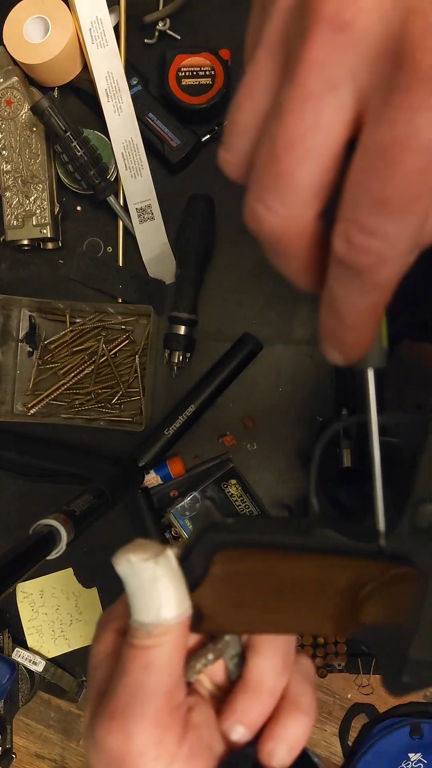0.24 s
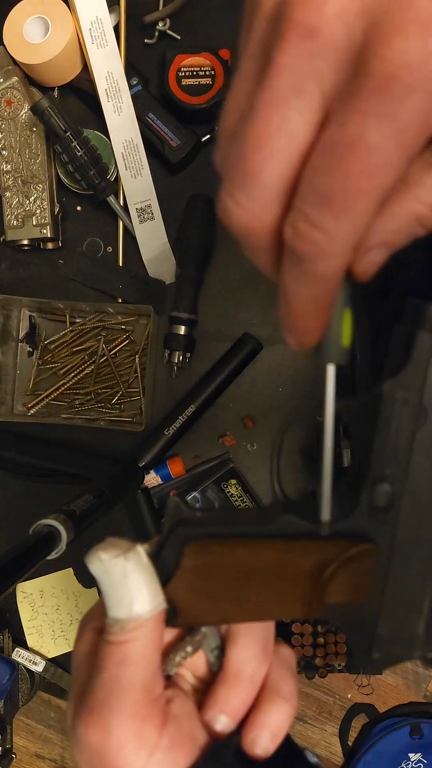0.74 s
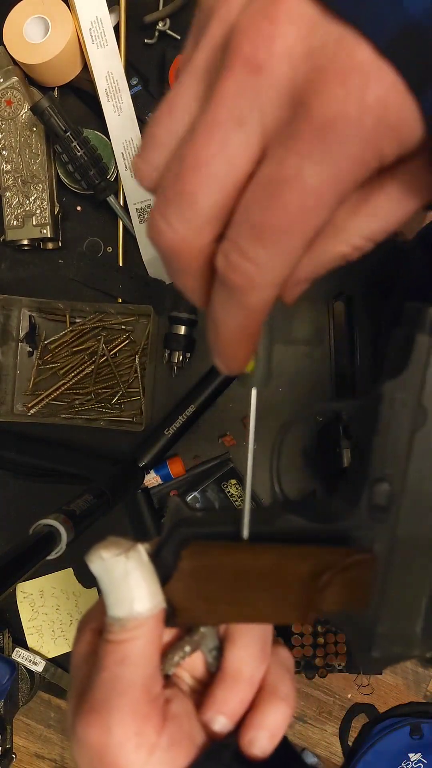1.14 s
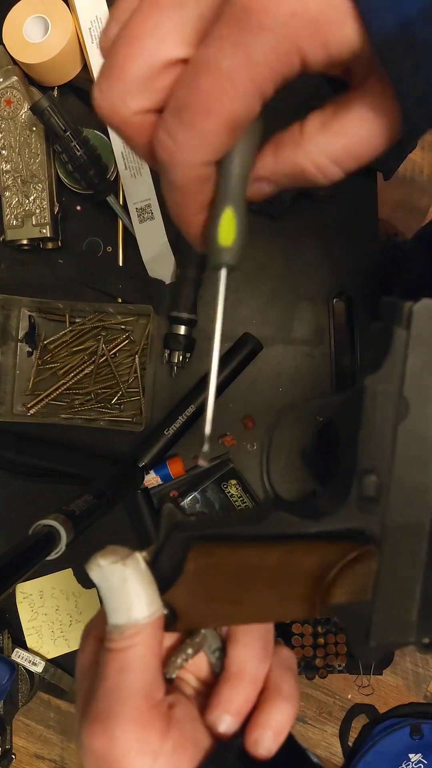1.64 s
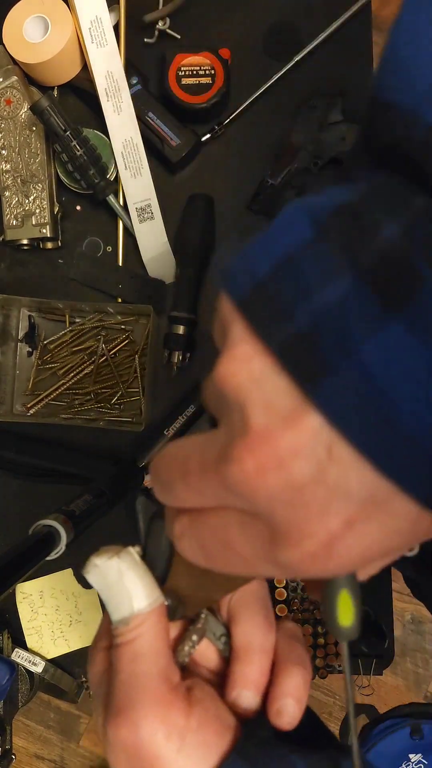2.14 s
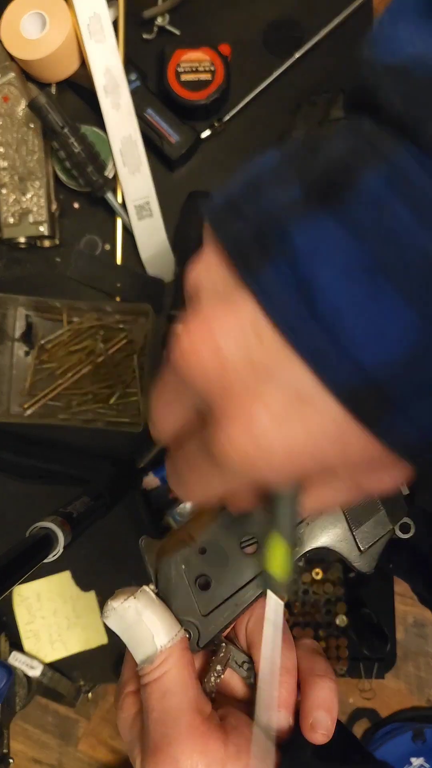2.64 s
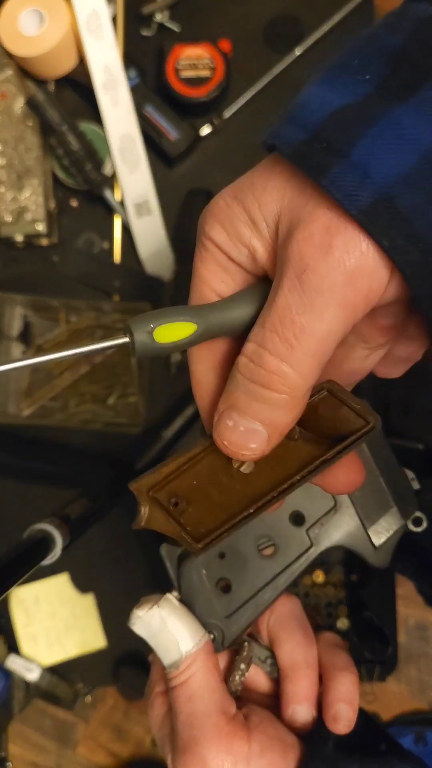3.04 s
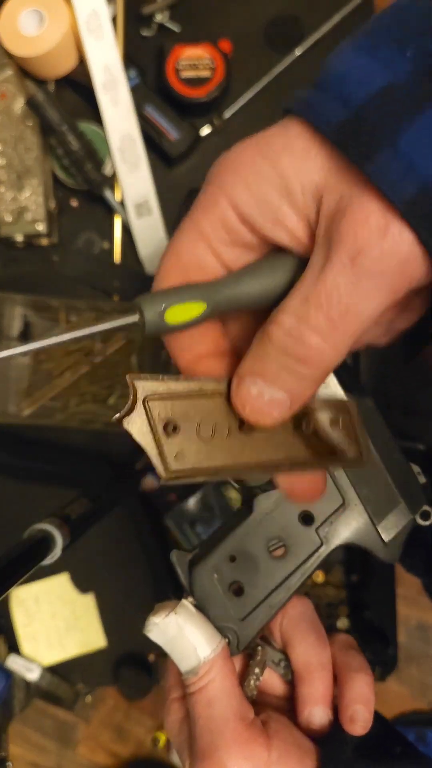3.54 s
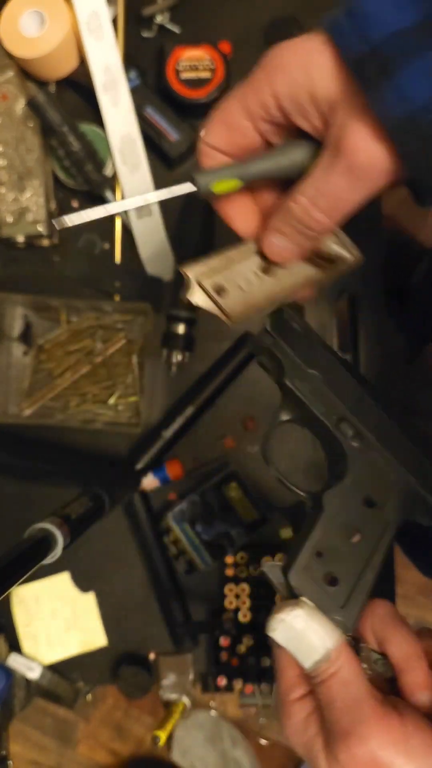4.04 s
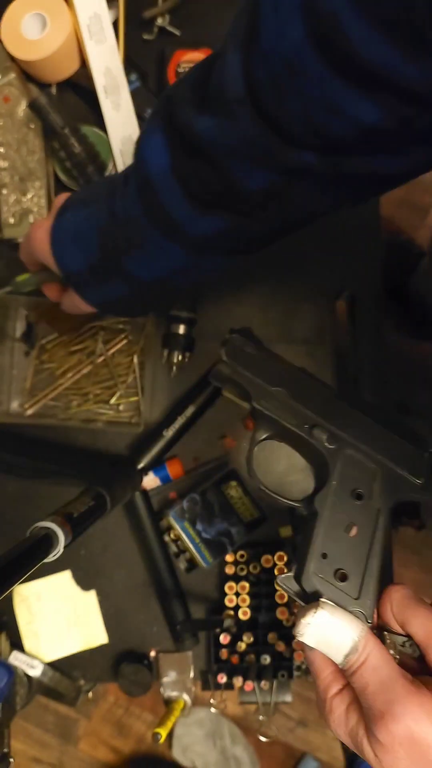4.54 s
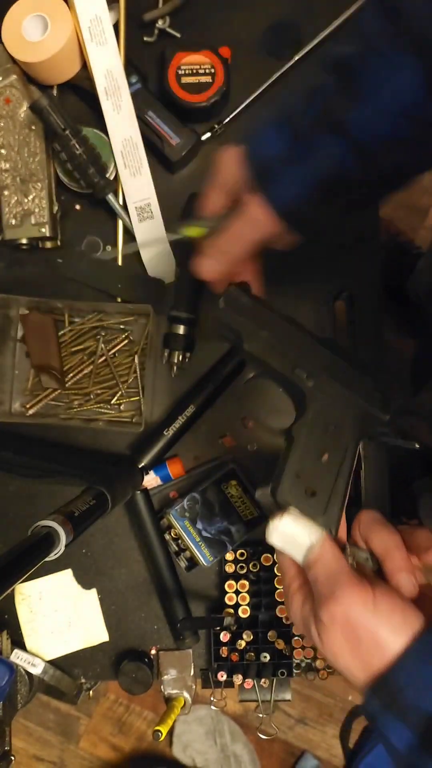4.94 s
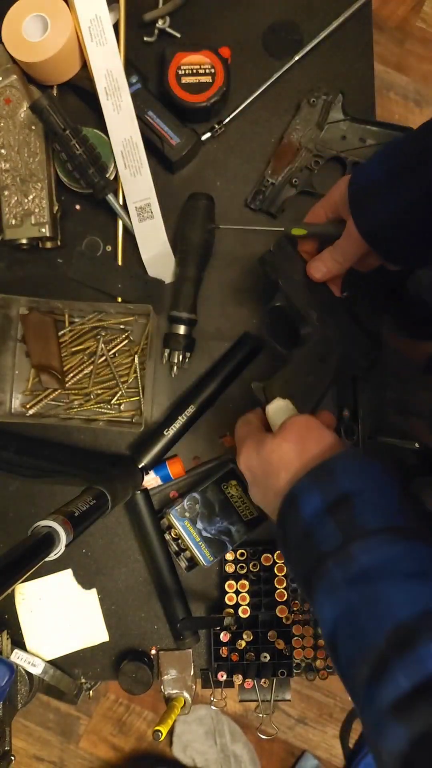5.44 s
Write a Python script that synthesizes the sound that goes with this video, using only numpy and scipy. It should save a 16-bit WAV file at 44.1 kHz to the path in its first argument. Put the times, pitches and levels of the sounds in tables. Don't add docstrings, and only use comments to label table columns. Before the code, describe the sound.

Close stereo phone recording at a workbench in a small room. Sleeve and finger rubbing, then a sharp screwdriver tap, a cluster of prying ticks and scrapes, and a hard metallic knock with quick rebounds. A plate pops and snaps loose with a faint squeal; after quiet handling it drops clattering into a tray of screws and bounces to rest. Low hum and hiss continue throughout.

```python
import sys
import numpy as np
from scipy import signal
from scipy.fft import rfft, irfft
from scipy.io import wavfile
from scipy.ndimage import uniform_filter1d

SR = 44100
rng = np.random.default_rng(int(sys.argv[2]) if len(sys.argv) > 2 else 0)


def to_linear_factor(level_db):
    exponent = np.asarray(level_db, float) / 20
    return 10 ** exponent


def file_out(sig):
    cols = np.atleast_2d(sig).T
    lim = np.clip(cols, -1, 1)
    pcm = np.round(lim * 32767).astype(np.int16)
    wavfile.write(sys.argv[1], SR, pcm)


N = 251370

# (frequency [Hz], density [dB per Hz])
ROOM_SPECTRUM = [(20, -21.5), (132, -9), (223, -17), (290, -23), (2100, -39), (4000, -45.5), (10300, -57),
                 (14500, -50.5)]
# (frequency [Hz], likeness [0-1])
ROOM_LIKENESS = [(100, 0.98), (250, 0.4), (600, 0.7), (2000, 0)]
# (frequency [Hz], level [dB], waver [dB])
HUM_LINES = [(120.3, -62.5, 1.3)]
# (frequency [Hz], width [Hz], level [dB])
MOTOR_BANDS = [(80.5, 20, -70.5), (118, 30, -73), (163, 12, -73.5), (200.3, 24, -67.5)]

FOREARM_SLIDES = [
    (-.05, .4, 0.16, -78, 0),
    (3.4, .4, 0.6, -78.5, 0),
    (4.33, .45, .7, -71, 0),
]
SLEEVE_STROKES = [(-.05, 0.25, 0.65, -67.5, -1), (.85, 0.29, 0.59, -78, -7), (.905, 0.04, 0.17, -61, 9.5),
                  (.97, 0.077, 0.54, -65.5, 4), (1.93, 0.087, 0.93, -59.5, -7),
                  (2.0, 0.11, 0.051, -57.5, -4), (2.08, 0.22, 0.29, -72, -9.5),
                  (2.36, 0.072, 0.15, -70.5, -19), (1.53, 0.1, 0.73, -58.5, -6),
                  (2.46, 0.087, 0.4, -71.5, -8), (2.67, 0.091, 0.15, -61, 1.5), (2.77, 0.22, 0.25, -75, -6),
                  (3.55, 0.3, 0.42, -78.5, -3), (4.35, 0.3, 0.14, -75, -8), (4.45, 0.48, 0.99, -61.5, -1.5),
                  (4.93, 0.13, 0.31, -52.5, -4), (5.15, 0.55, 0.62, -86, -18)]
SKIN_STROKES = [(0.6, 2.84, 0.56, -77.5, 1), (0.845, 0.17, 0.08, -58, 1), (0.97, 0.15, 0.6, -67.5, 13.5),
                (.62, 0.31, 0.06, -76.5, 3), (2.66, 0.056, 0.12, -58.5, 18.5), (1.1, 0.21, 0.7, -94.5, 20),
                (1.48, 0.052, 0.65, -63.5, 2.5), (1.62, 0.39, 0.69, -81, 9), (2.36, 0.22, 0.71, -70, 2),
                (3.38, 3.57, 0.45, -78.5, 1), (2.67, 0.15, 0, -67, 5), (2.74, 0.29, 0.46, -73.5, 2.5),
                (3.4, 0.19, 0.19, -66.5, 3), (3.585, 0.089, 0, -78, 3), (3.64, 0.14, 0.12, -74.5, 3.5),
                (3.88, 0.21, 0.1, -81, 2), (4.035, 0.13, 0.33, -71, 2), (4.35, 0.53, 0.4, -76.5, 4.5),
                (5.16, 0.25, 0.32, -88.5, 6), (5.38, 0.19, 0.22, -69.5, 4.5), (5.56, 0.093, 0.06, -71, 7.5),
                (5.6, 0.1, 0.18, -74, 3)]
SCRAPE_STROKES = [(.085, 0.063, 0.28, -60.5, 5), (.29, 0.13, 0.15, -80.5, -24), (.85, .06, .5, -66, 0),
                  (.965, 0.11, 0.52, -47.5, -8.5), (1.09, 0.059, 0.19, -79, 8),
                  (1.205, 0.077, 0.28, -63, -3), (1.29, 0.048, 0.58, -69, -8), (2.0, 0.13, 0.2, -63.5, 6),
                  (2.46, 0.074, 0.58, -66, -16), (3.41, 0.11, 0.44, -60.5, 10.5),
                  (4.95, 0.21, 0.3, -63, -6)]
HOLLOW_STROKES = [
    (-.03, 0.3, 0.17, -72, 0),
    (3.55, 0.28, 0.4, -75, 0),
]
FRAME_STROKES = [(.29, 0.087, 0.47, -83, 3), (.47, 0.039, 0.81, -79.5, -1), (.565, 0.019, 0.36, -83, 0),
                 (.85, 0.09, .3, -61, 3), (.97, 0.13, 0.48, -59, 0), (1.07, 0.197, 0.1, -76, 5),
                 (1.29, 0.04, .6, -74, -1), (1.33, 0.093, 0.74, -75, -12), (1.47, 0.075, 0.99, -62.5, -14),
                 (2.11, 0.092, 0.32, -80.5, 4), (2.29, 0.022, .1, -90, -13), (2.36, 0.093, 0.24, -63, -10),
                 (2.46, 0.08, 0.61, -59.5, -13), (3.42, 0.089, 0.42, -68, -3.5)]
PLATE_STROKES = [
    (2.288, 0.029, 0.13, -69, 0),
    (2.37, 0.048, .15, -68.5, 0),
    (2.46, 0.108, 0.34, -66.5, 0),
]
# (frequency [Hz], width [Hz], level [dB])
FRAME_BANDS = [(3170, 66, -14), (3400, 340, 0.33), (4495, 200, -9.5), (4860, 210, -8), (5200, 710, -5),
               (7170, 200, -7.5), (7400, 200, -9), (9200, 300, -14), (11300, 300, -16.5)]

FRAME_MODES = [(2510, -31, 0.033), (2970, -75, 0.043), (3350, 39, 0.019), (3662, 34.5, 0.03),
               (4566, 29, 0.066), (5240, -49, 0.018), (7260, 19, 0.036), (9300, -17, 0.15)]
TIP_MODES = [(3400, -1, 0.026), (4220, 1.5, 0.015), (4800, 3.5, 0.013), (7000, -12, .025),
             (7200, -11, 0.021), (9140, -11, 0.019), (10600, -10.5, .008)]
SHAFT_MODES = [(1100, -13.5, 0.079), (1720, -16, 0.034), (2610, -9, .035), (2970, -1, .03),
               (4200, -7, 0.069), (4560, -9, .04), (5570, -6, .025), (6750, 2.5, .028), (7700, -2, .022),
               (8500, -11, .025), (9150, 0, 0.025), (10600, -4.5, .018), (11700, -9.5, .016)]
PLATE_MODES = [(364.7, -18, 0.18), (688, -14, .06), (895, -13.5, 0.07), (1540, -11.5, 0.04),
               (1880, -5, 0.041), (2230, -10.5, 0.067), (2760, -4.5, 0.046), (3150, -9, 0.039),
               (2943, -14, 0.056), (3350, -3.5, 0.078), (4042, 1, 0.048), (5360, -17, 0.024)]
HELD_PLATE_MODES = [(650, -11, .022), (1430, 1, .02), (2380, -9, .022), (3440, .5, .009), (4170, -10, .014),
                    (5040, -8, .018), (6500, -11, .013), (7140, -13, .012), (8840, -20, .014)]
CATCH_MODES = [(1059, -19, 0.097), (1830, -12, 0.026), (2417, -6.5, 0.027), (3350, 2, 0.027),
               (4045, -15, 0.028), (4800, -24, .04), (6860, -20, 0.035), (7940, -16, 0.036),
               (11730, -15, .02)]

THUD_HITS = [
    (0.098, -46.5, 2700, -19.5, 0.39),
    (1.977, -49, 1430, -24, 0.027),
    (2.792, -58, 920, -30, 0.078),
    (2.848, -54, 1515, -25.5, 0.043),
    (4.375, -57, 1433, -26, 0.063),
    (4.591, -57.5, 1360, -24.5, 0.086),
    (5.598, -60, 900, -22, 0.05),
]
TAP_HITS = [
    (0.6467, -22.5, 3400, 0.5, 0.02),
    (0.6844, -46, 4800, -5, 0.13),
    (0.7405, -43.5, 3400, -3, 0.13),
]
PRISE_HITS = [
    (0.8145, -47.5, 2600, -19, 0.028),
    (0.9398, -43, 3020, -9, 0.048),
    (0.9732, -40.5, 2970, -22, 0.13),
    (2.2863, -37, 3350, -6, 0.084),
    (2.379, -45.5, 1830, 6, 0.0466),
    (2.549, -37.5, 3170, -18, 0.016),
]
TICK_HITS = [
    (.8458, -36, 3360, -16, .07),
    (.853, -36, 3400, -20, .06),
    (.9076, -22, 2660, 6, .034),
]
CHIP_HITS = [
    (0.9122, -34, 6000, -4, .04),
    (1.0035, -43, 3360, -10, .03),
    (1.045, -43, 7250, -3, .03),
    (1.5155, -32, 9000, 4, .05),
    (4.9252, -29, 7660, 2, .05),
    (4.9365, -36, 1900, -20, .03),
    (5.061, -46, 3500, -10, .04),
    (.9398, -37, 2960, -3, .05),
    (.9727, -41, 2300, -8, .05),
]
SNAG_HITS = [
    (1.109, -66, 3490, -18, 0.03),
    (1.1333, -64, 3340, -18, 0.028),
    (1.1453, -63, 3400, -6, 0.027),
    (1.1644, -64, 3450, -18, 0.031),
    (1.2017, -67, 3400, -18, 0.034),
    (1.221, -55.5, 4400, -18, 0.034),
    (1.2356, -53, 4860, -11, 0.03),
]
KNOCK_HITS = [
    (1.5192, -6.5, 4154, -10, 0.045),
    (1.5392, -18.5, 4200, -6, 0.06),
]
REBOUND_HITS = [
    (1.558, -22, 4250, -17, .045),
    (1.559, -21, 3400, -19, .07),
    (1.5932, -28, 4210, -19, .04),
    (1.6095, -40.5, 6800, -14.5, .1),
    (1.621, -51, 3400, -20, .18),
]
POP_HITS = [
    (1.9955, -35.5, 1440, -26, 0.019),
    (1.9995, -23, 3350, -28, 0.034),
    (2.026, -46, 1340, -30, 0.065),
]
SNAP_HITS = [
    (2.176, -46.5, 3350, 1.5, 0.034),
    (2.1819, -31.5, 3350, 3, 0.072),
    (2.1883, -29, 3380, -5.5, 0.071),
]
LIFT_HITS = [
    (2.6668, -33, 3200, -0.5, 0.019),
    (2.671, -32.5, 3350, -9, 0.026),
    (2.7067, -43.5, 4220, 8, 0.062),
    (2.718, -59, 3350, 5, .04),
]
CLATTER_HITS = [(4.7378, -17, 2108, -6, .09), (4.7532, -19, 2108, -5, .07), (4.7702, -17, 2192, -1, .05),
                (4.7725, -9.5, 1890, -6, .055), (4.7755, -10.5, 1890, -8, .028),
                (4.781, -15.5, 2990, -6, .085), (4.7935, -25, 1570, -4, .2), (4.8362, -10, 3300, -2, .06),
                (4.8485, -24, 1890, -3, .1), (4.8605, -23, 3000, -7, .06), (4.878, -31.5, 3350, -8, .2),
                (4.895, -33.5, 3400, -5, .09), (4.912, -42, 4200, -9, .06)]
BOUNCE_HITS = [
    (4.9403, -25.5, 3350, -6.5, 0.11),
    (4.9612, -27, 3260, -18, 0.045),
    (5.0357, -30, 3310, -23, 0.076),
    (5.0755, -40.5, 3270, -38, 0.068),
    (5.108, -50.5, 3300, -33, 0.07),
    (5.137, -54.5, 3300, -30.5, 0.05),
]

# (start [s], length [s], frequency [Hz], level [dB])
GLINT_SLIDES = [(1.03, .06, 4930, -63), (1.228, .035, 4860, -70), (1.297, .045, 4900, -76),
                (1.1, .23, 7170, -80), (1.359, .11, 9600, -86), (1.36, .093, 11200, -85),
                (1.0, .09, 7250, -64), (1.501, .012, 3370, -53), (1.492, .03, 7500, -62),
                (1.503, .016, 9200, -58), (.925, .024, 2950, -57), (.925, .024, 2200, -56),
                (2.178, .045, 1060, -69), (1.36, .09, 3400, -77), (5.608, .066, 4200, -84),
                (2.035, .07, 1400, -75.5), (2.079, .05, 636, -72), (2.1, .035, 423, -75),
                (2.121, .044, 582, -70), (2.16, .085, 388, -69.5), (3.887, .062, 9200, -81),
                (4.74, .017, 3350, -37), (4.9405, .011, 3350, -40), (5.206, .025, 3450, -80.5),
                (5.288, .052, 5500, -80), (5.392, .025, 3190, -73), (5.385, .035, 4770, -79),
                (5.4, .04, 13500, -80), (5.425, .087, 3680, -72), (5.43, .06, 4650, -76),
                (4.074, .072, 2200, -79), (4.07, .062, 3490, -80), (4.876, .028, 3350, -46),
                (4.872, .03, 4160, -51), (2.375, .085, 3400, -70), (2.474, .06, 4810, -73),
                (5.433, .06, 5660, -79), (5.434, .055, 6210, -73), (5.44, .04, 7150, -79),
                (5.449, .066, 11800, -76), (5.44, .05, 12600, -79), (5.566, .03, 13730, -74),
                (5.567, .04, 7600, -75), (5.57, .03, 9000, -77), (5.612, .05, 5970, -75),
                (5.622, .037, 7600, -77), (5.62, .04, 3500, -83)]
# (time [s], frequency [Hz], level [dB])
SQUEAL_PATH = [
    (2.232, 546.5, -70),
    (2.255, 557, -60),
    (2.29, 598, -63),
    (2.327, 516, -57),
    (2.388, 475, -67),
    (2.462, 473, -64),
    (2.577, 438, -74),
    (2.66, 430, -73),
]
# (time [s], level [dB], T60 [s])
BENCH_THUMPS = [
    (4.762, -38.5, 0.16),
    (4.835, -54, 0.67),
    (5.199, -65, 0.62),
]


def curve(points, hz):
    f, v = np.transpose(points)
    return np.interp(np.log(np.maximum(hz, 1)), np.log(f), v)


def unit(x, db=0):
    return x * to_linear_factor(db) / np.sqrt(np.mean(np.abs(x) ** 2))


def band(x, lo_hz, hi_hz):
    hi_hz = np.clip(hi_hz, lo_hz + 10, .45 * SR)
    return signal.sosfilt(signal.butter(2, [lo_hz, hi_hz], "bandpass", fs=SR, output="sos"), x)


def edge(hz, lo_hz, hi_hz):
    low, high = 1j * hz / lo_hz, 1j * hz / hi_hz
    high_pass = low ** 2 / (1 + np.sqrt(2) * low + low ** 2)
    return (high_pass / (1 + np.sqrt(2) * high + high ** 2)) ** 2


def walk(rate):
    hold = int(SR / rate)
    held = np.repeat(rng.standard_normal(N // hold + 1), hold)
    return 1.4 * uniform_filter1d(uniform_filter1d(held, hold), hold)[:N]


def late(x, samples):
    cycles = np.fft.rfftfreq(x.shape[-1])
    return irfft(rfft(x) * np.exp(-2j * np.pi * cycles * samples), x.shape[-1])


def grit(rough_db, own, lag):
    sizes = to_linear_factor(rough_db * np.minimum(rng.exponential(size=N), 5))
    shared, *apart = rng.standard_normal((3, N)) * sizes
    return np.array([shared, late(shared, lag)]) + own * np.array(apart)


def strokes(table, hz, centre_hz, bend_db, power):
    step = 64
    t = np.arange(0, N + step, step) / SR
    start, length, share, db, tilt_db = np.transpose(table)[:, :, None]
    progress, share = (t - start) / length, np.clip(share, .03, .97)
    swell = np.minimum(progress / share, (1 - progress) / (1 - share))
    shape = np.clip(swell, 0, 1) ** (2 * power)
    octaves = np.log2(np.array(hz, float) / centre_hz)
    levels = to_linear_factor(db + tilt_db * octaves - bend_db * octaves ** 2)
    gains = np.sqrt((levels ** 2).T @ shape)
    return [np.interp(np.arange(N) / SR, t, gain) for gain in gains]


def ring(hz, modes, spread_db, detune):
    f, db, t60 = np.transpose(modes)[:, :, None]
    level_luck, pitch_luck = rng.standard_normal((2, len(modes), 1))
    damping = np.log(1000) / t60
    poles = damping + 2j * np.pi * (hz - f * (1 + detune * pitch_luck))
    return np.sum(to_linear_factor(db + spread_db * level_luck) / poles, axis=0)


def contacts(table, modes, ring_db, note_db, note_t60, low_db, pan_db, lag, own, edge_hz, top_hz, rise_s, tail,
             clean=0.49):
    size = 8192
    out = np.zeros((2, N + size))
    t, hz = np.arange(size) / SR, np.fft.rfftfreq(size, 1 / SR)
    delay = np.exp(-2j * np.pi * hz / SR * np.array([[0], [lag]]))
    ports = to_linear_factor(np.array([[pan_db], [-pan_db]]) / 2) * delay
    for start, peak_db, note_hz, high_db, t60 in table:
        fade = np.exp(-np.log(1000) * t / np.clip(t60, .004, .2)) * np.minimum(t / rise_s, 1)
        fade *= tail + np.exp(-t / 0.00049)
        shared, *apart = rng.standard_normal((3, size)) * to_linear_factor(0.21 * rng.standard_normal((3, size)))
        chatter = (shared + own * np.array(apart)) * fade
        direct = rfft(chatter)
        drive = unit(rfft(chatter * fade)) + clean * np.exp(-2j * np.pi * hz * rise_s)
        drive = drive * edge(hz, 0.32 * edge_hz, 2.0 * top_hz)
        body = ring(hz, modes, spread_db=5.3 / (1 + clean ** 2), detune=0.017 / (1 + clean ** 2))
        note = ring(hz, [(note_hz, 0, min(note_t60, t60 / 2))], spread_db=0, detune=0)
        hit = unit(direct * edge(hz, edge_hz, top_hz))
        hit += unit(drive * body, ring_db) + unit(drive * note, note_db)
        hit += unit(direct * edge(hz, 760.0, 1900.0), low_db)
        hit += unit(direct * edge(hz, 7800.0, 30000.0), high_db + 4.5)
        hit = irfft(hit * ports, size) * np.clip((t[-1] - .01 - t) / .03, 0, 1)
        first = int(start * SR)
        out[:, first:first + size] += hit * to_linear_factor(peak_db) / np.abs(hit.mean(axis=0)).max()
    return out[:, :N]


def room_air():
    hz = np.fft.rfftfreq(N, 1 / SR)
    alike = np.clip(curve(ROOM_LIKENESS, hz), 0, .88)
    shares = np.sqrt([np.ones_like(hz), (1 - alike) / (1 + alike)])
    mid, side = rfft(rng.standard_normal((2, N))) * to_linear_factor(curve(ROOM_SPECTRUM, hz)) * shares
    air = irfft(np.array([mid + side, mid - side]), N)
    return unit(air) * to_linear_factor(-66 + 0.84 * walk(2.3))


def mains_hum():
    t, hum = np.arange(N) / SR, 0
    for hz, db, waver_db in HUM_LINES:
        level = np.sqrt(2) * to_linear_factor(db + waver_db * walk(30))
        hum = hum + level * np.sin(2 * np.pi * hz * t + 0.37 * waver_db * walk(5.8))
    return hum


def motor_drone():
    return sum(unit(band(rng.standard_normal(N), hz - width / 2, hz + width / 2), db)
               for hz, width, db in MOTOR_BANDS)


def forearm_sliding():
    brush = unit(band(rng.standard_normal(N), 290., 750.))
    gain = strokes(FOREARM_SLIDES, [500.], centre_hz=500., bend_db=0, power=.8)[0]
    return brush * gain * to_linear_factor(2.5 * walk(30))


def rubbing():
    grains, out = grit(rough_db=2.5, own=4.7, lag=2.8), 0
    tilt = [(700, -12.5), (2300, -3.0), (2900, -9.0), (4400, -5.0),
            (6000, -9.0), (8000, 0.5), (10500, -10.5), (15000, -1.5)]
    centres = 750 * 2 ** np.arange(0, 4.5, 1 / 3)
    sleeve = strokes(SLEEVE_STROKES, centres, centre_hz=1510, bend_db=1.5, power=1.6)
    skin = strokes(SKIN_STROKES, centres, centre_hz=8000, bend_db=1.5, power=1.5)
    scrape = strokes(SCRAPE_STROKES, centres, centre_hz=4000, bend_db=20.5, power=1.8)
    for k, hz in enumerate(centres):
        gain = np.sqrt(skin[k] ** 2 + sleeve[k] ** 2 + scrape[k] ** 2)
        patch = unit(band(grains, hz / 2 ** (1 / 5), hz * 2 ** (1 / 5)))
        out = out + (-1) ** k * patch * gain * to_linear_factor(curve(tilt, hz) + 1.2 * walk(21))
    return out * to_linear_factor(np.array([[1.2], [-1.2]]) + 1.6 * walk(120))


def hollow_brushing():
    hz, width_hz = 2054, 410
    grains = grit(rough_db=2.5, own=0.99, lag=1.1)
    gain = strokes(HOLLOW_STROKES, [hz], centre_hz=hz, bend_db=0, power=0.46)[0]
    return unit(band(grains, hz - width_hz / 2, hz + width_hz / 2)) * gain


def wall_echo(near):
    t = np.arange(int(.5 * SR)) / SR
    t60_s, level_db = 0.069, -13
    walls = band(rng.standard_normal((2, len(t))), 150.0, 4400.0)
    walls *= np.exp(-np.log(1000) * t / t60_s) * np.minimum(t / 0.0011, 1)
    walls *= to_linear_factor(level_db) / np.sqrt(np.sum(walls ** 2, axis=1, keepdims=True))
    return signal.fftconvolve(near.mean(axis=0)[None], walls, axes=1)[:, :N]


def thuds():
    return contacts(THUD_HITS, PLATE_MODES, ring_db=3.0, note_db=13.5, note_t60=0.0063, low_db=-23, pan_db=15.0,
                    lag=3.9, own=1.0, edge_hz=470.0, top_hz=2620.0, rise_s=0.00151, tail=2.0)


def frame_dragging():
    grains, frame = grit(rough_db=2.5, own=0.99, lag=1.1), 0
    centres = [hz for hz, width, db in FRAME_BANDS]
    gains = strokes(FRAME_STROKES, centres, centre_hz=2300.0, bend_db=0, power=0.25)
    for (hz, width, db), gain in zip(FRAME_BANDS, gains):
        resonance = unit(band(grains, hz - width / 2, hz + width / 2))
        frame = frame + resonance * gain * to_linear_factor(db + 1.2 * walk(22))
    return frame * to_linear_factor(4.3 * walk(110))


def taps():
    return contacts(TAP_HITS, TIP_MODES, ring_db=5.0, note_db=-20.5, note_t60=0.02, low_db=-29, pan_db=2.5,
                    lag=0.98, own=0.94, edge_hz=7600.0, top_hz=5970.0, rise_s=0.000333, tail=0.37, clean=7.3)


def prises():
    return contacts(PRISE_HITS, FRAME_MODES, ring_db=10.5, note_db=12.0, note_t60=0.052, low_db=-31.0, pan_db=4.5,
                    lag=2.1, own=0.79, edge_hz=700.0, top_hz=5760.0, rise_s=0.00033, tail=5.9)


def ticks():
    return contacts(TICK_HITS, FRAME_MODES, ring_db=1.5, note_db=7.0, note_t60=0.03, low_db=-22, pan_db=4.5,
                    lag=1.4, own=0.75, edge_hz=2550.0, top_hz=5800.0, rise_s=0.000085, tail=0.62)


def chips():
    return contacts(CHIP_HITS, TIP_MODES, ring_db=-2.5, note_db=2.5, note_t60=0.02, low_db=-20, pan_db=2.0,
                    lag=2.5, own=.8, edge_hz=1700.0, top_hz=8000.0, rise_s=0.00058, tail=0.4)


def glints():
    out, tremble = np.zeros((2, N)), walk(260)
    for start, length, hz, db in GLINT_SLIDES:
        span = slice(int(start * SR), int((start + length) * SR))
        shake = np.roll(tremble, int(hz))[span]
        port_phase = np.array([[0], [.8]]) * rng.standard_normal()
        phase = 2 * np.pi * np.cumsum(hz * (1 + 0.0078 * shake)) / SR + port_phase
        swell = np.sin(np.linspace(0, np.pi, len(shake))) ** .7
        out[:, span] += np.sqrt(2) * to_linear_factor(db + 5.0 * shake[::-1]) * np.sin(phase) * swell
    return out


def snags():
    return contacts(SNAG_HITS, TIP_MODES, ring_db=20.0, note_db=-2.0, note_t60=0.017, low_db=-33, pan_db=10.0,
                    lag=1.6, own=0.74, edge_hz=2900.0, top_hz=5500.0, rise_s=0.0015, tail=1.0)


def knocks():
    return contacts(KNOCK_HITS, SHAFT_MODES, ring_db=-2.5, note_db=-5, note_t60=0.022, low_db=-22, pan_db=2.0,
                    lag=4.62, own=0.94, edge_hz=2300.0, top_hz=6900.0, rise_s=0.0005, tail=0.46, clean=1.2)


def rebounds():
    return contacts(REBOUND_HITS, SHAFT_MODES, ring_db=-5.5, note_db=4.0, note_t60=0.03, low_db=-9.5, pan_db=5.5,
                    lag=2.2, own=1.0, edge_hz=1500.0, top_hz=6520.0, rise_s=0.00033, tail=0.51, clean=1.8)


def pops():
    return contacts(POP_HITS, HELD_PLATE_MODES, ring_db=5.0, note_db=0.5, note_t60=0.012, low_db=-24, pan_db=6.5,
                    lag=8.57, own=0.94, edge_hz=820.0, top_hz=4440.0, rise_s=0.00033, tail=0.34, clean=1.6)


def snaps():
    return contacts(SNAP_HITS, CATCH_MODES, ring_db=2.5, note_db=-1.0, note_t60=0.019, low_db=-11, pan_db=2.5,
                    lag=2.37, own=0.84, edge_hz=1470.0, top_hz=5860.0, rise_s=0.0016, tail=0.69, clean=1.7)


def squeal():
    t = np.arange(N) / SR
    s, hz, db = np.transpose(SQUEAL_PATH)
    phase = 2 * np.pi * np.cumsum(np.interp(t, s, hz) * (1 + 0.0235 * walk(56))) / SR
    gate = np.clip(np.minimum(t - s[0], s[-1] - t) / 0.013, 0, 1)
    level = np.sqrt(2) * gate * to_linear_factor(np.interp(t, s, db) - 6.5 + 2.5 * walk(70))
    return level * (np.sin(phase) + to_linear_factor(-6.5) * np.sin(phase / 2))


def plate_dragging():
    hz = 1718.0
    grains = grit(rough_db=2.5, own=0.99, lag=1.1)
    gain = strokes(PLATE_STROKES, [hz], centre_hz=hz, bend_db=0, power=0.25)[0]
    return unit(band(grains, hz - 17, hz + 17)) * gain


def lifts():
    return contacts(LIFT_HITS, FRAME_MODES, ring_db=4.5, note_db=1.0, note_t60=0.036, low_db=-5.5, pan_db=0.0,
                    lag=0.33, own=0.36, edge_hz=1960.0, top_hz=5900.0, rise_s=0.00086, tail=1.2)


def clatter():
    return contacts(CLATTER_HITS, PLATE_MODES, ring_db=-8.5, note_db=-0.5, note_t60=0.028, low_db=-21.0, pan_db=1.8,
                    lag=3.0, own=.7, edge_hz=900.0, top_hz=5600.0, rise_s=0.0018, tail=0.92)


def bench_boom():
    t, gain = np.arange(N) / SR, 0
    boom = unit(band(rng.standard_normal(N), 50., 320.0))
    for start, db, t60 in BENCH_THUMPS:
        decay = np.exp(-np.log(1000) * np.maximum(t - start, 0) / t60)
        gain = gain + to_linear_factor(db) * (t > start) * decay
    return boom * gain


def bounces():
    return contacts(BOUNCE_HITS, PLATE_MODES, ring_db=-4.5, note_db=0.0, note_t60=0.019, low_db=-43, pan_db=3.5,
                    lag=2.7, own=1.0, edge_hz=1090.0, top_hz=3740.0, rise_s=0.00086, tail=0.4)


def scene():
    near = rubbing() + hollow_brushing() + thuds() + frame_dragging()
    near += taps() + prises() + ticks() + chips() + glints() + snags()
    near += knocks() + rebounds()
    near += pops() + snaps() + plate_dragging() + lifts()
    near += clatter() + bounces()
    steady = room_air() + mains_hum() + motor_drone() + forearm_sliding() + squeal() + bench_boom()
    return near + wall_echo(near) + steady


def roll_off(x):
    return signal.sosfilt(signal.butter(12, 16970, fs=SR, output="sos"), x)


def record(dry):
    cut = signal.sosfilt(signal.ellip(8, .2, 45, 15900, fs=SR, output="sos"), dry)
    return roll_off(cut)


dry = scene()
out = record(dry)
file_out(out)
```